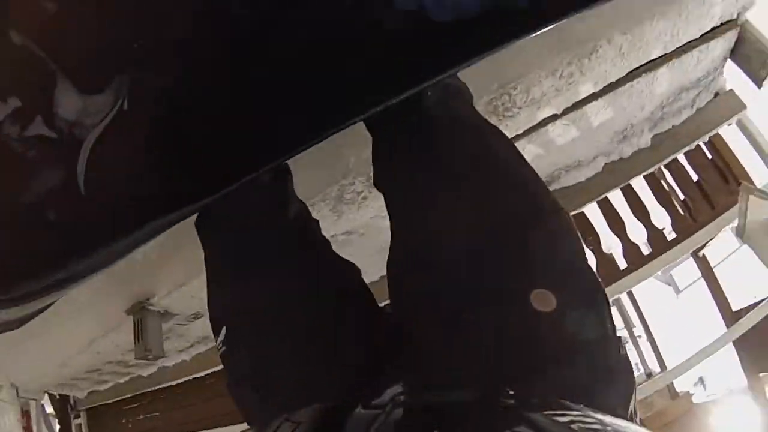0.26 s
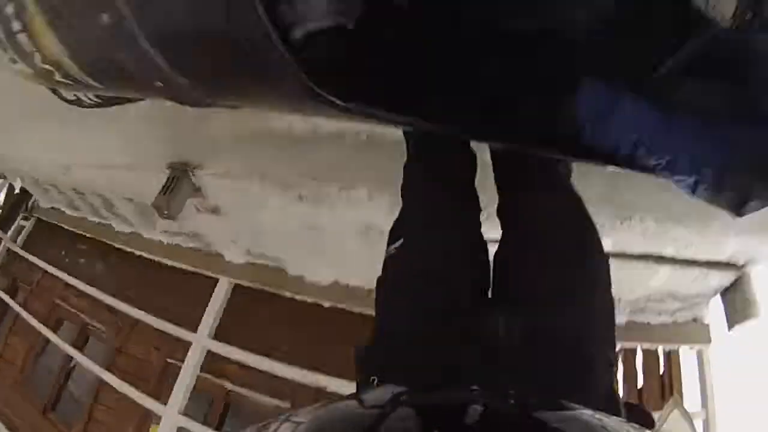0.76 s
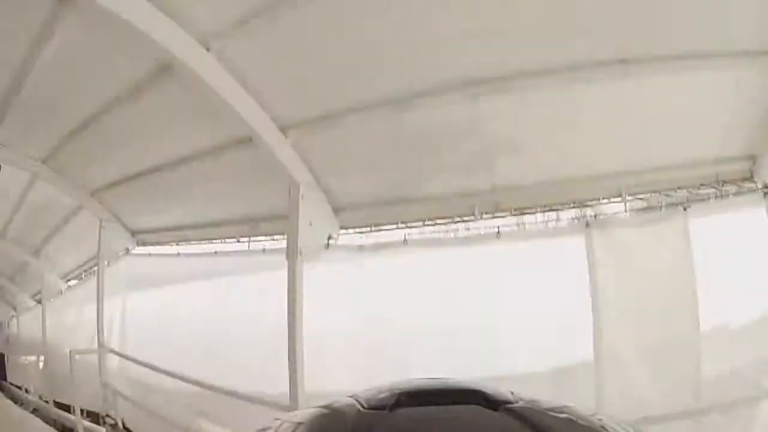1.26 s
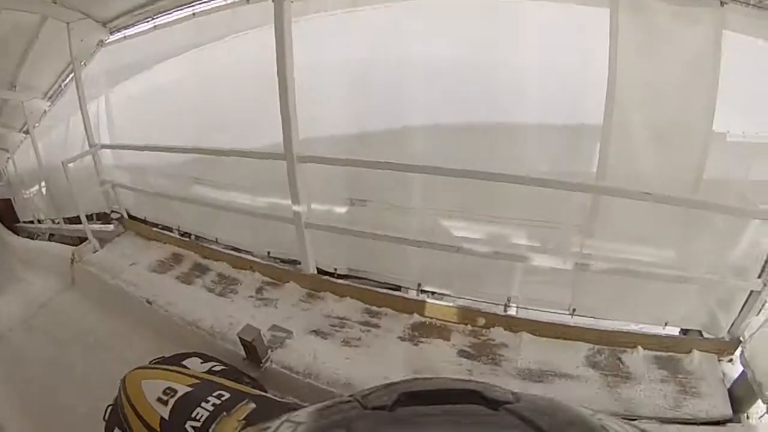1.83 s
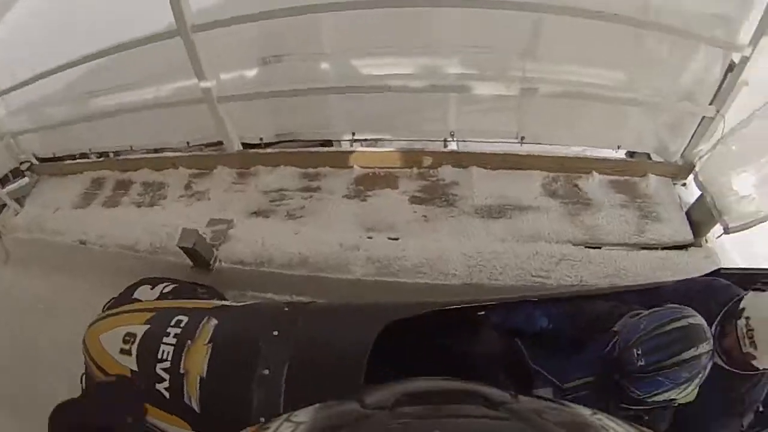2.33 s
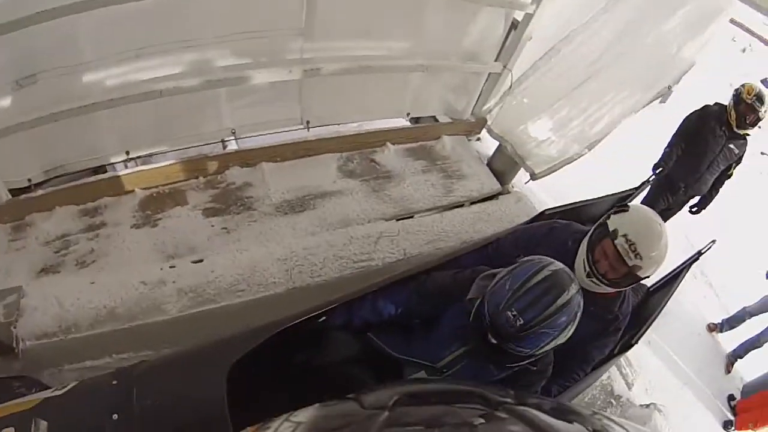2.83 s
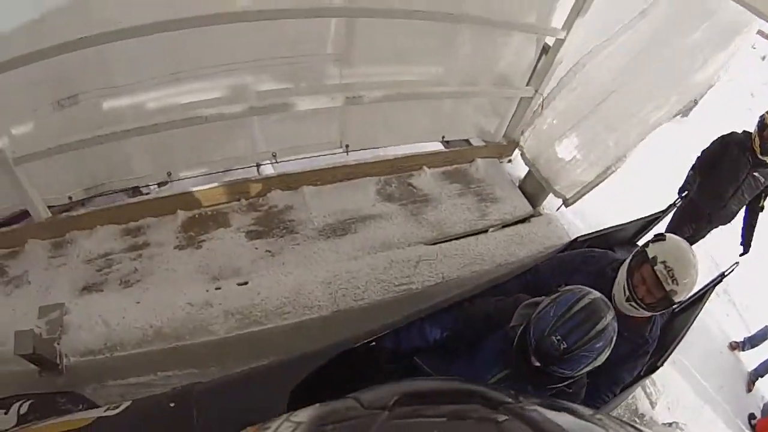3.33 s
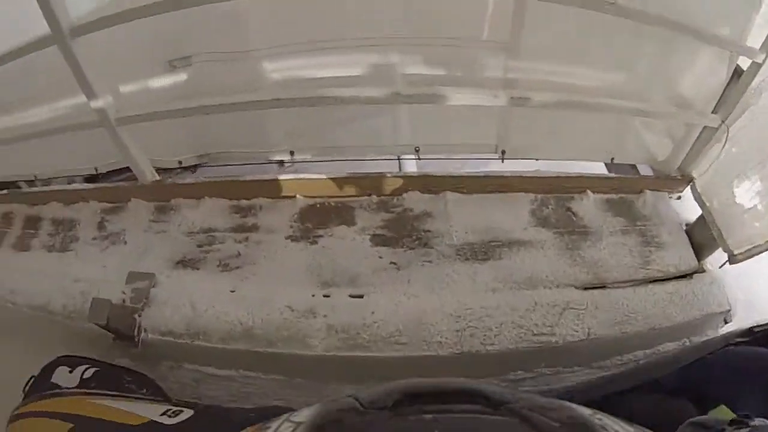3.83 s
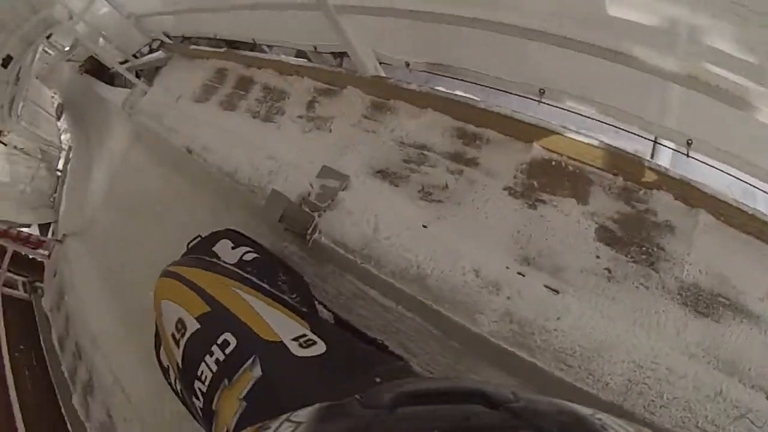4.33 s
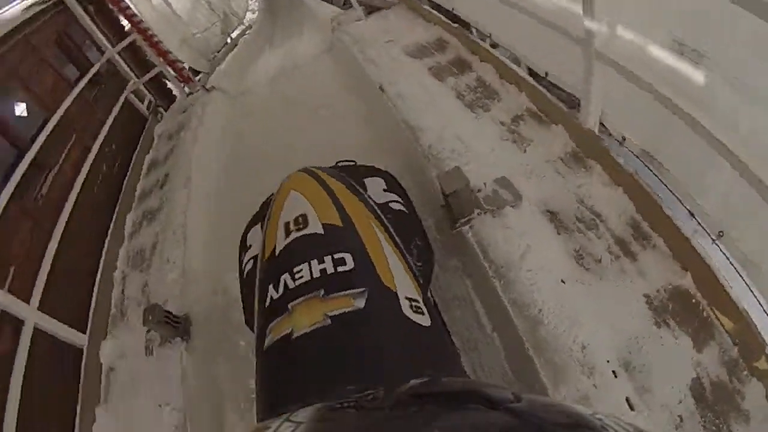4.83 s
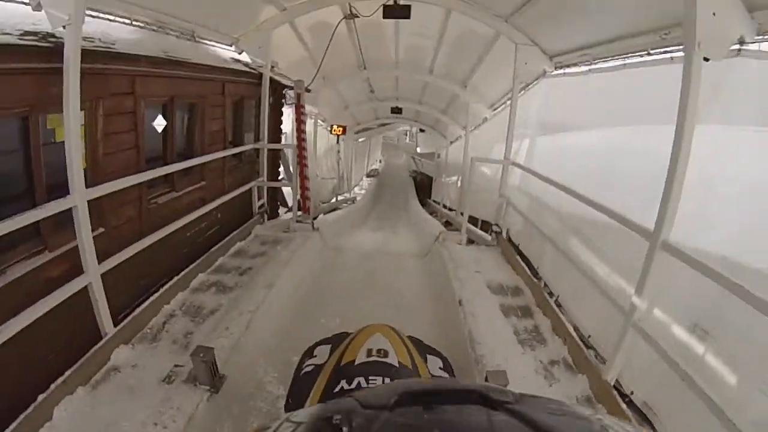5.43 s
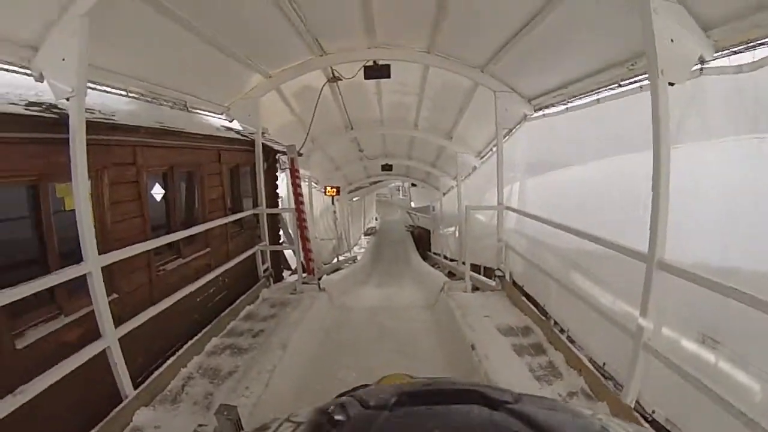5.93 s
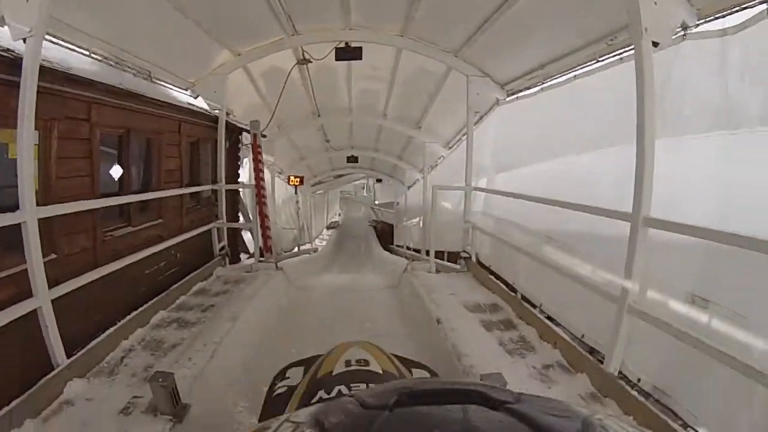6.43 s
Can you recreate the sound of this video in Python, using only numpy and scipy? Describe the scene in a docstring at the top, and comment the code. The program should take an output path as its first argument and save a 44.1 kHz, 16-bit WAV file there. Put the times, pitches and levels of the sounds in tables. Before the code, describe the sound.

The sound is close and boxy, heard from inside a helmet camera's hard plastic case. From the start, straps and gloves tick, rub and scrape irregularly on the case while the mount thuds and trembles. Sharp clicks with deep lurches stand out at about 1.3 and 1.7 seconds, and the heaviest knock and thump lands at 2.2 seconds. After 2.5 seconds the handling dies down to light rubbing and a few soft bumps. Boots crunch on packed snow with a short echo under the track's roof, clearest at 3.2 and 4.3 seconds, with fainter steps just before 4 seconds. A single plastic click comes at 4.7 seconds, followed by a quiet stretch. Soft steps return around 6 and 6.4 seconds, with light ticks and rubbing until the end at about 6.7 seconds. Faint hiss and very low wind continue throughout.

```python
"""Top of a roofed ice track, beside a sled, heard from inside a helmet camera's hard plastic case.
Straps and gloves tick, rub and scrape on the case and excite its resonances.
The mount thuds, lurches and trembles in low swings as the head turns.
Boots crush packed snow, with an echo under the roof. Low wind and faint hiss lie underneath."""
import sys
import numpy as np
from scipy import signal
from scipy.fft import rfft, irfft, next_fast_len
from scipy.io import wavfile

SR = 44100
rng = np.random.default_rng(int(sys.argv[2]) if len(sys.argv) > 2 else 0)


def pcm_store(signal):
    """Save signal as 16-bit PCM."""
    levels = np.round(np.clip(np.atleast_2d(signal), -1, 1) * 32767)
    wavfile.write(sys.argv[1], SR, levels.astype(np.int16).T)


N = 294147

# Ticks on the case: (time [s], level [dB], pitch [Hz], brightness [dB], ring [dB], snap [dB])
TICKS = [(0.067, -31.5, 1920, -30, -41, -33), (.3274, -14, 2430, -13.5, -21.5, -27),
         (0.3853, -28, 1880, -15, -36, -28), (.387, -12, 2040, -15.5, -28, -26),
         (0.5349, -26, 1990, -42, -14, -42), (.613, -27, 1560, -28, -34, -30),
         (0.6851, -18, 2500, -20, -16.5, -40), (.712, -21, 2650, -12, -22, -32),
         (0.7371, -17.5, 2080, -17, -22.5, -39), (0.779, -25.5, 2725, -17.5, -30, -34),
         (0.859, -38, 2005, -25, -34, -34), (0.9746, -20, 2340, -23, -20, -53),
         (1.2471, -20, 2380, -17, -28, -40), (1.27, -6.5, 2500, -15.5, -23.5, -53),
         (1.3593, -31, 1813, -13, -34, -34), (1.3873, -12, 2254, -17, -50, -57),
         (1.429, -31, 1720, -17, -36, -39), (1.481, -19, 2080, -12, -16.5, -43),
         (1.511, -13, 2320, -21, -21, -50), (1.5334, -12.5, 2380, -18.5, -24, -46),
         (1.5488, -20.5, 2410, -22, -34, -43), (1.5602, -26, 1750, -8, -37, -39),
         (1.5709, -20.5, 2060, -18, -25, -45), (1.7455, -10, 2432, -13, -39, -43),
         (1.812, -36, 1762, -7, -38, -12), (1.845, -27, 2757, -13, -34, -29),
         (1.875, -17, 2434, -13.5, -32, -46), (1.8853, -18.5, 2360, -25, -19, -46),
         (2.1103, -9.5, 2490, -9, -29, -48), (2.2031, -10, 2382, -17, -15, -41),
         (2.213, -5, 1970, -35.5, -39.5, -39.5), (2.217, -12, 1675, -8, -19.5, 3.5),
         (2.242, -22.5, 1960, -22.5, -33.5, -43), (2.304, -35, 1740, -6, -31, -37),
         (2.3719, -32.5, 1635, -23, -38, -28), (2.3835, -24.5, 2660, -3.5, -20, -18),
         (2.4184, -33, 2140, -3, -32, -13), (2.4337, -30, 2074, -9, -37, -35),
         (4.7095, -18, 2923, -10, -20, -23), (4.791, -39.5, 2590, -26, -34, -30),
         (5.113, -46.5, 2350, -21, -34, -26), (5.151, -48, 1670, -5, -34, -27),
         (5.294, -51, 2940, 3, -34, -15), (6.377, -32.5, 1656, -6, -23, -17),
         (6.616, -28, 2020, -16, -44, -24), (6.6515, -31.5, 2110, -38, -28, -41)]
# Broad case resonances: (frequency [Hz], width [Hz], gain [dB])
CASE_MODES = [(372.7, 27, 0.5), (932, 77, -14.5), (1448, 182, -2), (1832, 254, 4.5), (2463, 250, 2.5),
              (3017, 330, -2), (3606, 470, -8), (4840, 2000, -20.5), (5815, 400, -7.5), (6590, 235, -13.5),
              (8100, 2070, -27.5), (12003, 696, -32)]
# Narrow, lingering case modes: (frequency [Hz], level [dB], t60 [s])
RING_MODES = [(404, -9, 0.103), (763, -17, 0.079), (925, -10, 0.11), (1962, -18, .2), (2120, -10, .16),
              (2390, -26, .12), (2760, -18, 0.061), (3290, -28, .1), (4010, -21, .085)]
# Thuds on the mount: (time [s], level [dB], t60 [s], rise [s])
THUDS = [(0.093, -21, 0.23, 0.0029), (0.213, -20, 0.088, 0.0017), (0.328, -30, 0.12, 0.0013),
         (0.391, -35, 0.16, .002), (0.542, -26, 0.35, 0.0022), (.858, -26, 0.33, .002),
         (.981, -38, 0.25, 0.0023), (1.188, -24, 0.2, .002), (1.626, -3, 0.22, 0.035),
         (1.717, -15, 0.12, 0.0025), (1.837, -21, 0.26, 0.0079), (2.115, -26, 0.24, .002),
         (2.2134, -3.5, 0.32, .004), (2.387, -22, 0.14, 0.0018), (2.425, -23.5, 0.15, 0.0081),
         (2.593, -38.5, 0.38, .002), (3.422, -25.5, 0.16, .002), (3.52, -33.5, 0.15, .002),
         (4.723, -41.5, 0.24, .002), (6.611, -43, .25, .002)]
# Head jolts: (time [s], level [dB], frequency [Hz])
LURCHES = [(0.209, -22, 170), (0.635, -14.5, 41), (0.738, -20, 24), (.859, -33, 32.3), (1.187, -17, 30.3),
           (1.256, 4, 32.5), (1.702, -2, 142), (1.713, -3.5, 44.5), (1.781, -11, 25.1), (2.2155, 3.5, 86),
           (2.329, -19, 24.2), (2.767, -32, 35), (3.183, -28, 50)]
# Mount shake envelope: (time [s], level [dB])
TREMBLE_LEVELS = [(0, -33), (.25, -42.5), (.53, -47.5), (.68, -23), (.84, -47.5), (.95, -32.5),
                  (1.06, -57.5), (1.17, -46), (1.3, -31), (1.65, -29.5), (1.93, -32.5), (2.0, -53),
                  (2.15, -51), (2.3, -37), (2.45, -35.5), (2.52, -56), (2.63, -50.5), (2.9, -59.5),
                  (3.45, -50.5), (3.7, -61.5), (3.91, -49.5), (4.24, -63.5), (4.6, -67), (4.95, -58.5),
                  (5.23, -77), (5.45, -54.5), (5.89, -72.5), (6.33, -53.5), (6.55, -50.5), (6.67, -46.5)]
# Boots on snow: (time [s], level [dB], crush length [s], brightness [dB], echo [dB])
STEPS = [(2.896, -44.5, 0.012, 17, 1), (3.175, -15, .019, -20, -4), (3.816, -36.5, 0.021, 5, -15),
         (3.9677, -32, 0.007, 5, -18.5), (4.2892, -13, 0.012, 7.5, -11.5), (5.48, -48, 0.019, 11, -19),
         (6.027, -37, 0.019, 7, -7.5), (6.363, -28, 0.019, 7, -1)]
# Crushed snow: (frequency [Hz], density [dB])
SNOW_SPECTRUM = [(88, -6), (150, 0), (530, -11.5), (656, -11), (736, -15), (1220, -14.5), (1630, -1.5),
                 (2140, -4), (2450, -1), (3160, -2), (3550, -7), (4140, -5), (6350, -14), (10300, -30.5),
                 (15500, -42)]
# Cloth rub envelope: (time [s], level [dB])
RUB_LEVELS = [(0, -44), (.39, -58), (.59, -50.5), (.97, -61.5), (1.22, -53), (1.6, -49), (1.76, -45.5),
              (1.89, -57.5), (2.13, -65), (2.28, -61.5), (3.46, -59.5), (3.96, -57.5), (4.09, -71),
              (5.91, -82), (6.32, -59.5), (6.54, -60), (6.67, -57.5)]
# Strap and glove scrapes: (peak time [s], level [dB], Gaussian width [s], brightness [dB])
SCRAPES = [(0.249, -65, .018, 21), (0.64, -49, 0.026, -6), (0.674, -39, .04, 5.5), (1.271, -35.5, .013, -3),
           (1.563, -47, 0.025, -16), (1.74, -26, 0.011, -5), (1.888, -34.5, 0.0088, -26),
           (2.229, -50, .006, 11), (2.257, -45, 0.012, -1), (2.306, -40.5, 0.0095, -10),
           (2.406, -64, .014, 19), (2.428, -43, 0.0065, -10), (2.652, -51.5, 0.0093, -2),
           (2.756, -60.5, 0.033, 5), (3.546, -60.5, 0.059, -18), (3.645, -59, 0.0084, -11),
           (3.86, -56, 0.032, -23), (4.022, -62, 0.024, 8), (4.105, -54, 0.019, -7),
           (5.305, -75.5, 0.011, 25.5), (5.436, -63, .015, 11), (5.507, -61, 0.019, -2.5),
           (6.037, -61, 0.022, 8), (6.515, -50.5, 0.02, 4)]
# Wind and sway envelope: (time [s], level [dB])
WIND_LEVELS = [(0, -44), (.38, -60), (.72, -52), (1.11, -53.5), (1.47, -44), (1.91, -44), (2.17, -63),
               (2.32, -33), (2.51, -50), (3.1, -46.5), (3.7, -50.5), (4.18, -44), (4.7, -52), (5.2, -47),
               (6.06, -45.5), (6.48, -42), (6.67, -58)]
# Background hiss: (frequency [Hz], density [dB])
HISS_SPECTRUM = [(88, -13.5), (150, 7.5), (175, -4.5), (244, -4.5), (790, -10.5), (1830, -12), (4410, -16),
                 (5680, -20.5), (13200, -27), (14800, -34.5), (16000, -67.5)]

CONTACT_S, RATTLE_DB = 0.0016, -32.5
MOUNT_HZ, LURCH_T60_CYCLES, LURCH_RISE_CYCLES = 114.75, 5.23, 0.67
CRUSH_T60_S, ECHO_T60_S = 0.19, 0.42
RUB_BRIGHT_DB = 1
CRACKLE_MAX_PER_S, CRACKLE_GAIN_DB, CRACKLE_THRESHOLD_DB = 60, 2.5, -61
HISS_DB, CUTOFF_HZ = -61.5, 15700


def ticks():
    """Short rough contacts knock the case and rattle out; narrow modes linger."""
    out, t = np.zeros(N), np.arange(5000) / SR
    snap_band = signal.butter(3, [6500, 13500], "band", fs=SR, output="sos")
    ring = sum(gain_of(db - 60 * t / t60_s) * np.sin(2 * np.pi * hz * t) for hz, db, t60_s in RING_MODES)
    force = np.exp(-t / CONTACT_S) + gain_of(RATTLE_DB) * np.exp(-t / 0.017)
    for time_s, db, hz, bright_db, ring_db, snap_db in TICKS:
        noise = rng.standard_normal(len(t))
        contact = noise * force * np.minimum(t / 0.00076, 1)
        low, high = case_bands(contact)
        low += 2.2 * treble_cut(resonate(contact, hz, 230))  # struck spot favours one pitch
        snap = signal.sosfilt(snap_band, noise * np.exp(-t / 0.00056))  # hard-edge crack
        knock = unit_peak(low) + gain_of(bright_db) * unit_peak(high)
        knock += gain_of(snap_db) * unit_peak(snap)
        add(out, time_s, gain_of(db) * (knock + gain_of(ring_db) * ring))
    return out


def case_bands(x, drift_db=np.zeros((12, 1))):
    """Case resonances as (low, high) bands; neighbours alternate in sign."""
    modes = [(-1) ** k * gain_of(db + drift_db[k]) * resonate(x, hz, width_hz)
             for k, (hz, width_hz, db) in enumerate(CASE_MODES)]
    return treble_cut(sum(modes[:7])), sum(modes[7:])


def treble_cut(x):
    """The lower resonances keep little treble above about 5 kHz."""
    return signal.sosfilt(signal.butter(4, 5000, fs=SR, output="sos"), x)


def thuds():
    """Pushes set the mount swinging at its own note."""
    return -swings([(time_s, db, MOUNT_HZ, t60_s, rise_s) for time_s, db, t60_s, rise_s in THUDS])


def lurches():
    """Head jolts: a few low swings each."""
    return swings([(time_s, db, hz, LURCH_T60_CYCLES / hz, LURCH_RISE_CYCLES / hz)
                   for time_s, db, hz in LURCHES])


def tremble():
    """Movement shakes the mount: unsteady note, rough shudder above, loose wobble below."""
    pitch_hz = MOUNT_HZ * (1 + 0.072 * wander(14.63))
    note = np.sin(2 * np.pi * np.cumsum(pitch_hz) / SR) * gain_of(3.5 * wander(35))
    shake = rng.standard_normal(N) * gain_of(7.1 * wander(34))
    shudder = unit_rms(resonate(resonate(shake, 157, 84), 149, 106))
    shudder += 0.061 * unit_rms(resonate(resonate(shake, 360, 45), 339, 55))
    wobble = unit_rms(resonate(resonate(shake, 73, 35), 80, 45))
    return gain_of(envelope_db(TREMBLE_LEVELS)) * (unit_rms(note) + 0.25 * shudder + 0.27 * wobble)


def steps():
    """Snow crushes in ragged bursts of grains; a duller echo decays under the roof."""
    out = np.zeros(N)
    grains, echo = shaped_noise(SNOW_SPECTRUM), shaped_noise(SNOW_SPECTRUM)
    grains *= gain_of(1.64 * wander(244) + 1.65 * wander(55))
    fine = signal.sosfilt(signal.butter(2, 7000, "high", fs=SR, output="sos"), grains)
    echo = signal.sosfilt(signal.butter(2, 8000, fs=SR, output="sos"), echo)
    echo *= gain_of(0.64 * wander(35))
    for time_s, db, crush_s, bright_db, echo_db in STEPS:
        start = round(time_s * SR)
        span = slice(start, start + SR // 2)
        t = np.arange(len(out[span])) / SR
        load = (0.55 + 0.4 * np.minimum(t / crush_s, 1)) * np.minimum(t / 0.0043, 1)
        release = gain_of(-60 * np.maximum(t - crush_s, 0) / CRUSH_T60_S)
        fine_gain = gain_of(bright_db) * np.minimum(0.29 + t / 0.049, 1)  # finest grains build late
        crunch = (grains[span] + (fine_gain - 1) * fine[span]) * load * release
        echo_gain = gain_of(echo_db - 60 * t / ECHO_T60_S) * np.minimum(t / 0.075, 1)
        out[span] += gain_of(db - 11.5) * (crunch + echo[span] * echo_gain)
    return out


def rub():
    """Fibres slip on the case in uneven grains: continuous rub plus short scrapes."""
    rub_db, t = envelope_db(RUB_LEVELS), np.arange(N) / SR
    low_gain, high_gain = gain_of(rub_db), gain_of(rub_db + RUB_BRIGHT_DB)
    for time_s, db, width_s, bright_db in SCRAPES:
        swell = gain_of(db) * np.exp(-((t - time_s) / width_s) ** 2 / 2)
        low_gain += swell
        high_gain += gain_of(bright_db) * swell
    grains = rng.standard_normal(N) * gain_of(1.8 * wander(240) + 0.7 * wander(50))
    drift_db = [2.5 * wander(11) for _ in CASE_MODES]  # roaming contact shifts the colour
    low, high = case_bands(grains, drift_db)
    return (low_gain * low + high_gain * high) / np.std(low)


def crackle():
    """Stray small ticks, denser and stronger with harder rubbing."""
    rub_db = envelope_db(RUB_LEVELS)
    rate_per_s = CRACKLE_MAX_PER_S * np.clip((rub_db - CRACKLE_THRESHOLD_DB) / 12, 0, 1)
    strength = gain_of(4.3 * np.minimum(rng.exponential(1, N), 3))
    impulses = strength * (rng.random(N) < rate_per_s / SR)
    force = signal.oaconvolve(impulses, np.exp(-np.arange(600) / SR / CONTACT_S))[:N]
    low, high = case_bands(force * rng.standard_normal(N))
    case_rms = np.std(case_bands(rng.standard_normal(SR))[0])
    return gain_of(rub_db + CRACKLE_GAIN_DB) * (low + 0.87 * high) / case_rms


def wind():
    """Wind and sway: lumpy pressure at the bottom of hearing."""
    band = signal.butter(2, [6, 19], "band", fs=SR, output="sos")
    pressure = unit_rms(signal.sosfilt(band, rng.standard_normal(N)))
    return gain_of(envelope_db(WIND_LEVELS) + 1.33 * wander(3.94)) * pressure


def hiss():
    """Faint steady noise floor."""
    return gain_of(HISS_DB) * shaped_noise(HISS_SPECTRUM)


def swings(rows):
    """Damped sines, each building over a short push."""
    out, t = np.zeros(N), np.arange(SR // 2) / SR
    for time_s, db, hz, t60_s, rise_s in rows:
        envelope = gain_of(db - 60 * t / t60_s) * (1 - np.exp(-t / rise_s))
        add(out, time_s, envelope * np.sin(2 * np.pi * hz * t))
    return out


def resonate(x, hz, width_hz):
    """One resonance, unity gain at centre."""
    r = np.exp(-np.pi * width_hz / SR)
    feedback = [2, -4 * r * np.cos(2 * np.pi * hz / SR), 2 * r * r]
    return signal.lfilter([1 - r * r, 0, r * r - 1], feedback, x)


def shaped_noise(spectrum):
    """Noise with the given spectrum, rms 1."""
    points_hz, db = np.transpose(spectrum)
    return filtered_noise(lambda hz: gain_of(np.interp(np.log(hz + 1), np.log(points_hz), db)))


def wander(rate_hz):
    """Random drift up to about rate_hz, rms 1."""
    return filtered_noise(lambda hz: np.exp(-(hz / rate_hz) ** 2))


def filtered_noise(response):
    """White noise weighted by response(hz), rms 1."""
    size = next_fast_len(N)
    bins = rfft(rng.standard_normal(size)) * response(np.fft.rfftfreq(size, 1 / SR))
    return unit_rms(irfft(bins, size)[:N])


def envelope_db(rows):
    """Level at every sample."""
    times_s, db = np.transpose(rows)
    return np.interp(np.arange(N) / SR, times_s, db)


def gain_of(db):
    return 10 ** (np.asarray(db) / 20)


def unit_rms(x):
    return x / np.sqrt(np.mean(x ** 2) + 1e-20)


def unit_peak(x):
    return x / abs(x).max()


def add(mix, time_s, sound):
    part = mix[round(time_s * SR):][:len(sound)]
    part += sound[:len(part)]


def scene():
    """Mono sum at the microphone inside the case."""
    rumble = thuds() + lurches() + tremble() + wind()
    return (rumble + ticks() + rub() + steps() + hiss() + crackle())[None]


def record(dry):
    """Steep low-pass."""
    taps = signal.firwin(255, CUTOFF_HZ, window=("kaiser", 9), fs=SR)
    return signal.oaconvolve(dry, taps[None], "same")


dry = scene()
out = record(dry)
pcm_store(out)
```